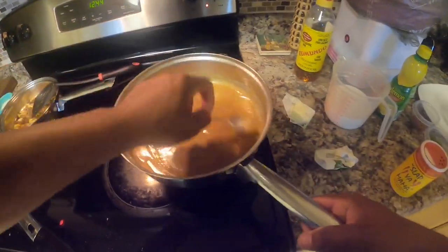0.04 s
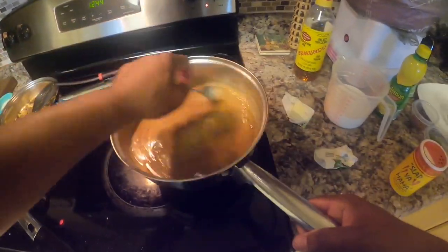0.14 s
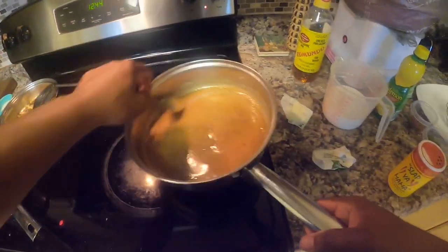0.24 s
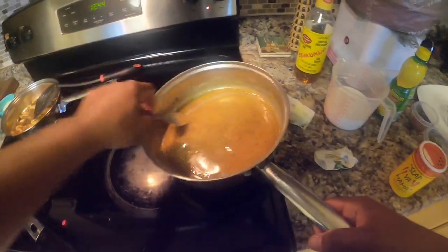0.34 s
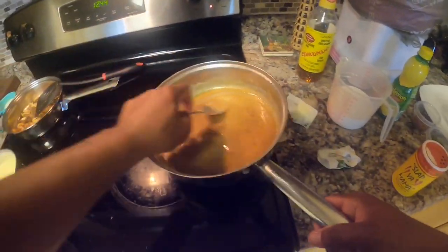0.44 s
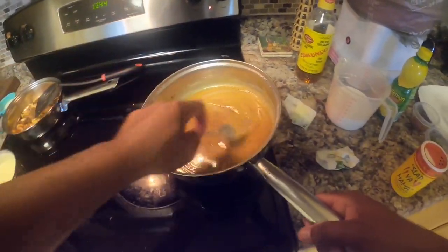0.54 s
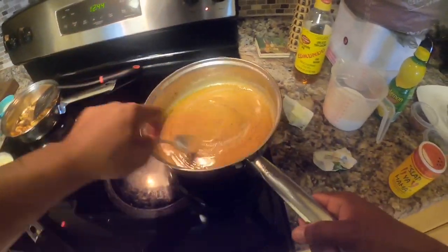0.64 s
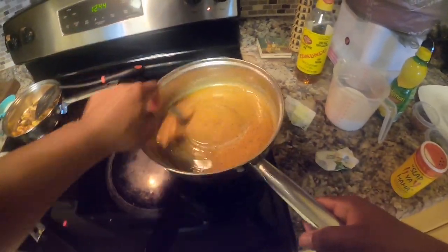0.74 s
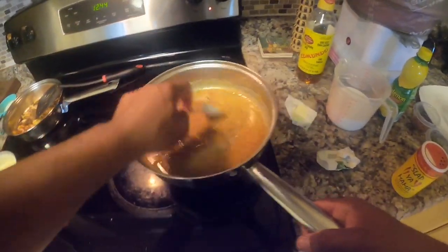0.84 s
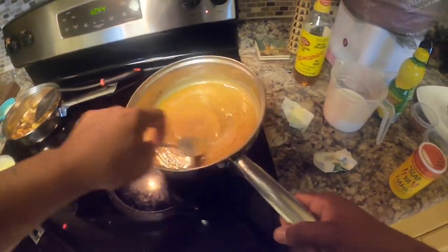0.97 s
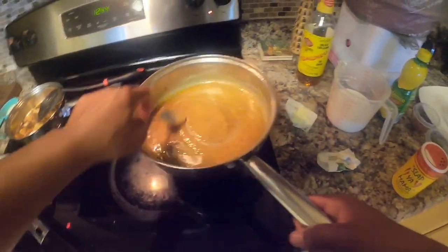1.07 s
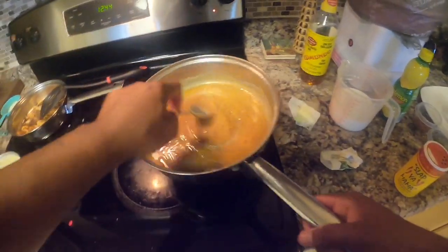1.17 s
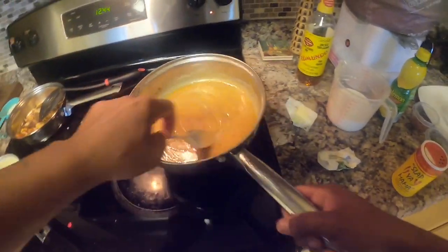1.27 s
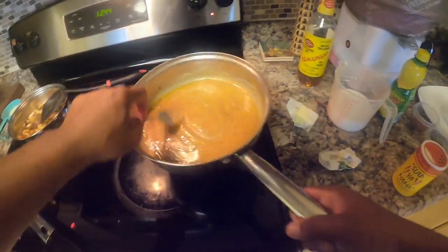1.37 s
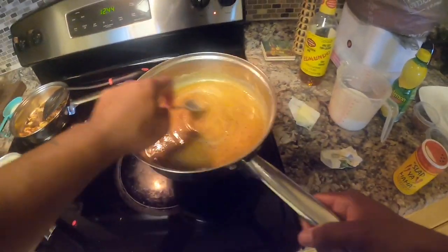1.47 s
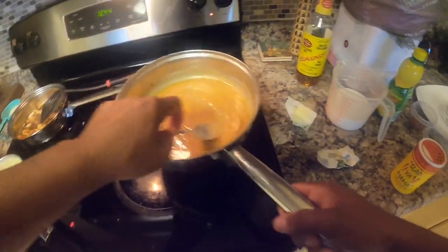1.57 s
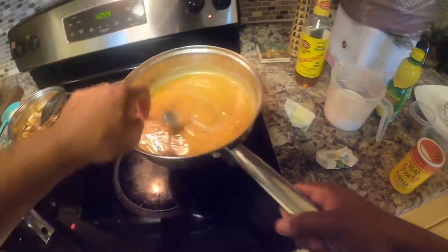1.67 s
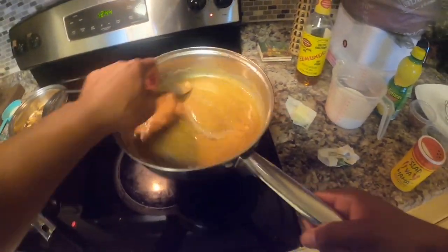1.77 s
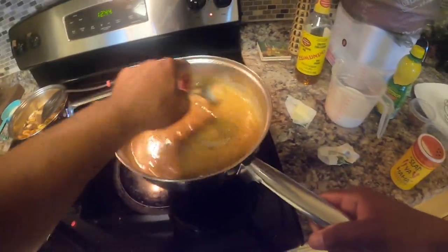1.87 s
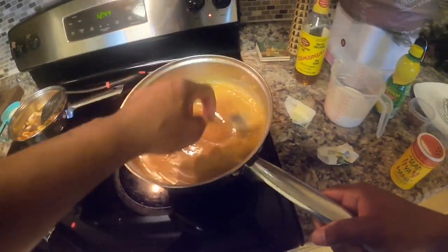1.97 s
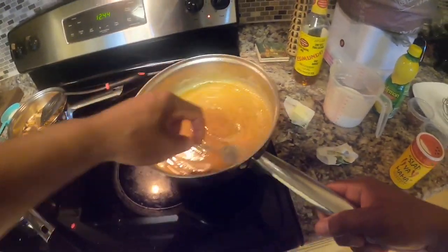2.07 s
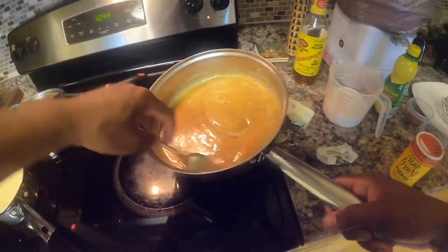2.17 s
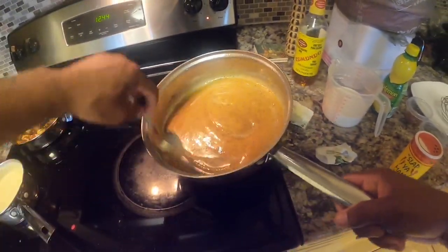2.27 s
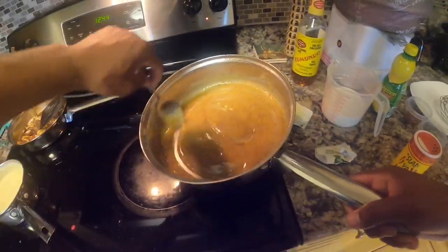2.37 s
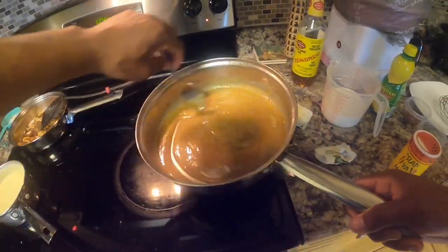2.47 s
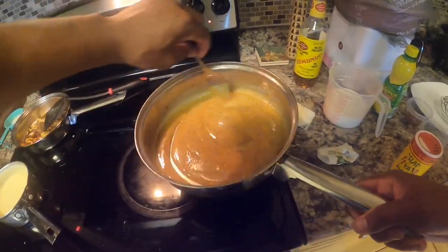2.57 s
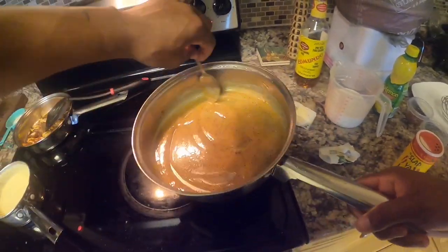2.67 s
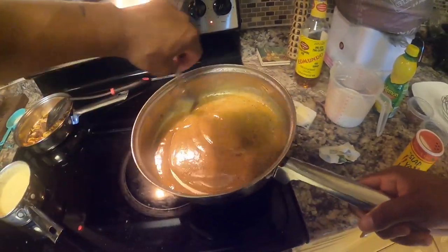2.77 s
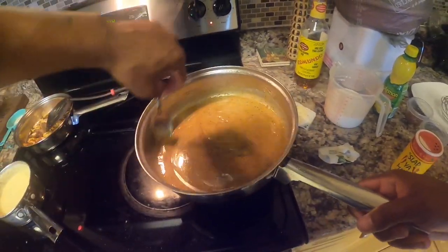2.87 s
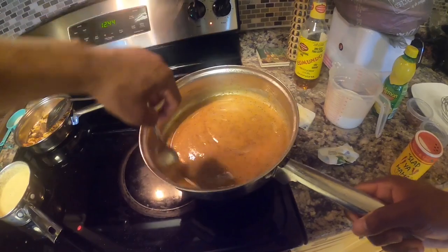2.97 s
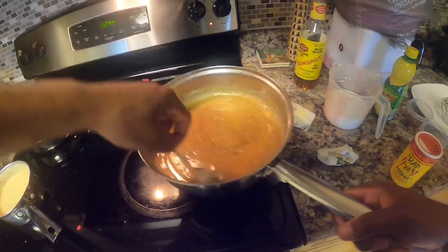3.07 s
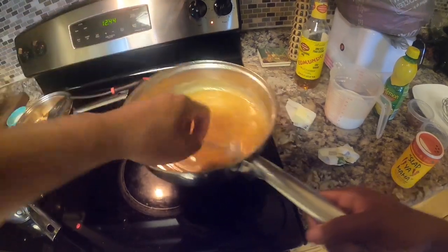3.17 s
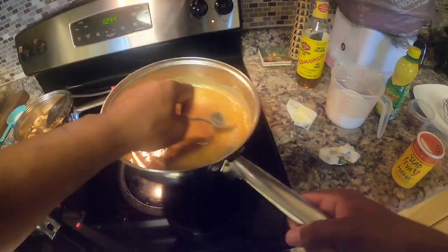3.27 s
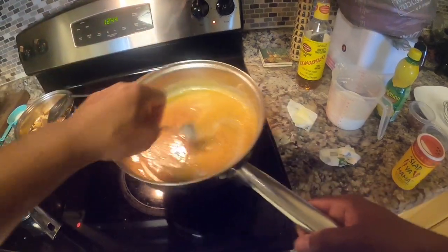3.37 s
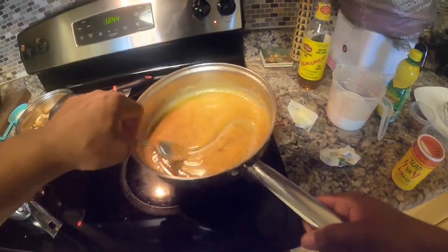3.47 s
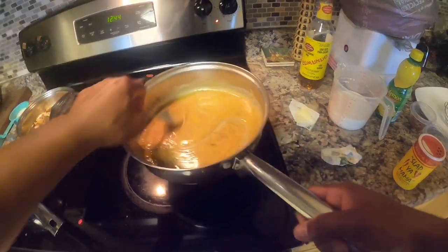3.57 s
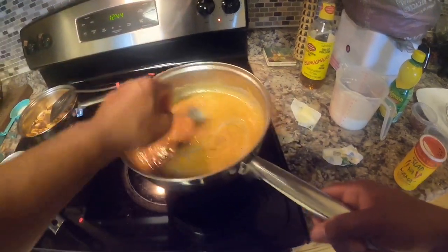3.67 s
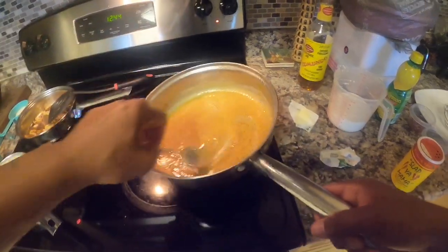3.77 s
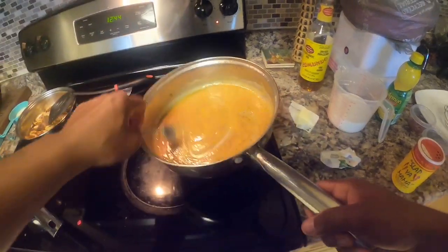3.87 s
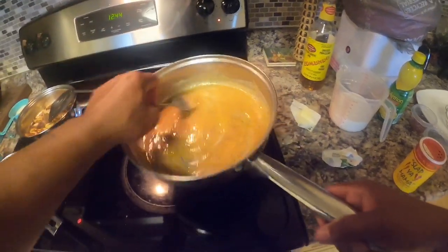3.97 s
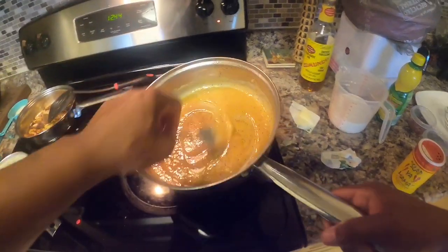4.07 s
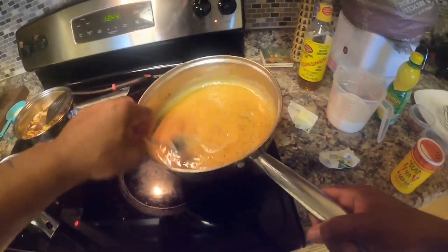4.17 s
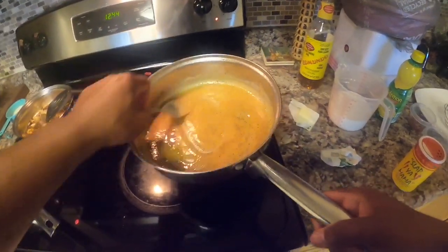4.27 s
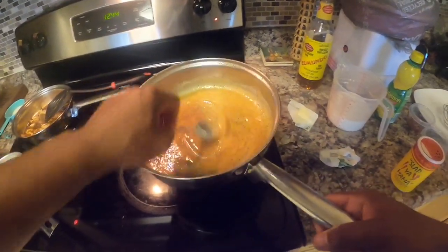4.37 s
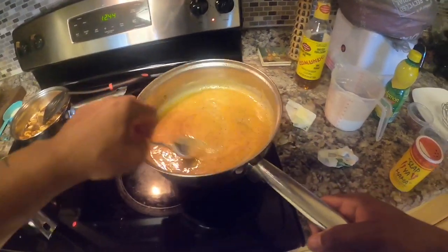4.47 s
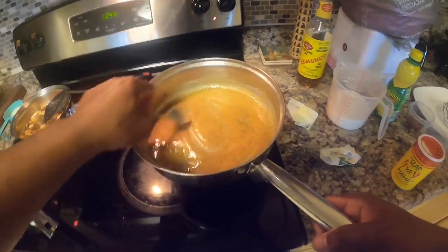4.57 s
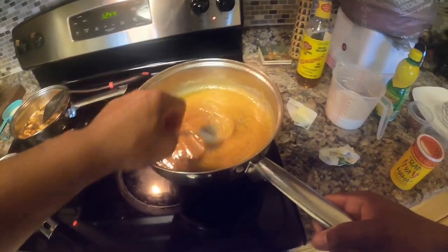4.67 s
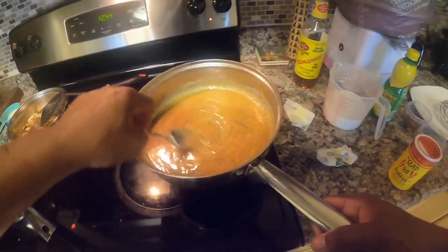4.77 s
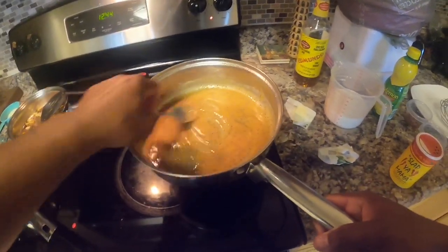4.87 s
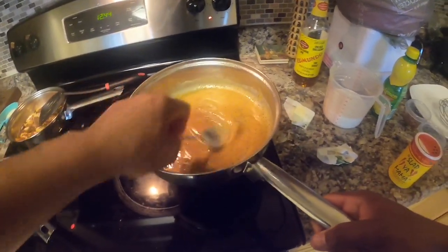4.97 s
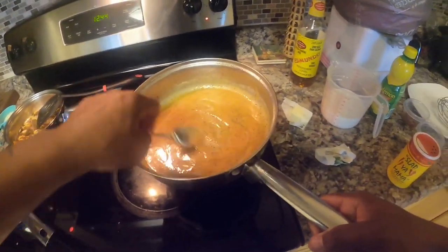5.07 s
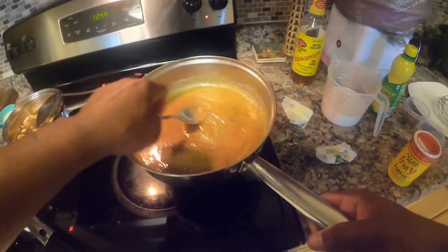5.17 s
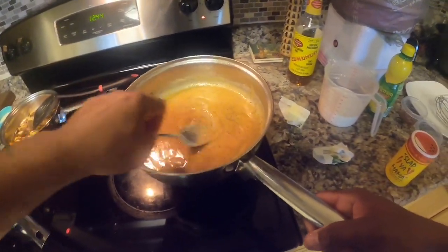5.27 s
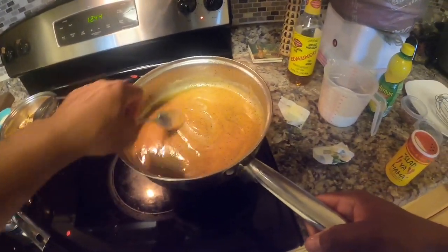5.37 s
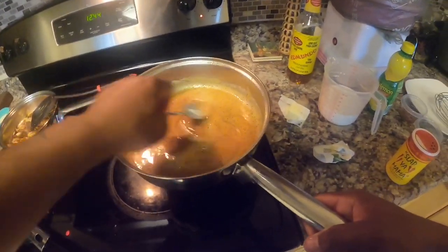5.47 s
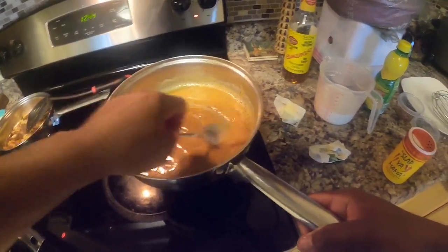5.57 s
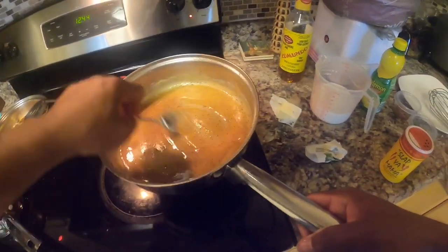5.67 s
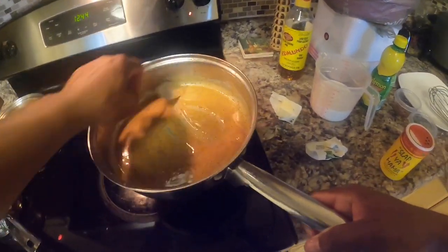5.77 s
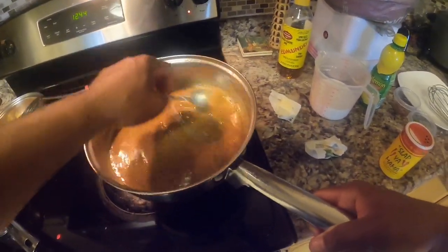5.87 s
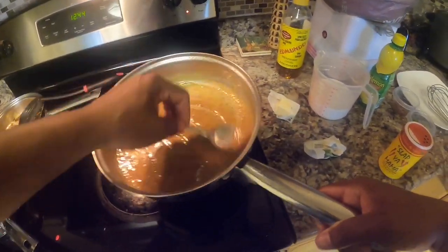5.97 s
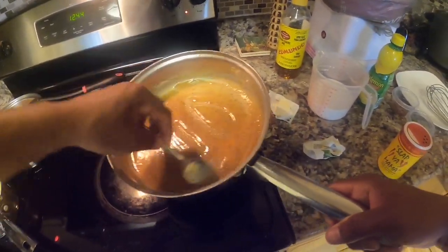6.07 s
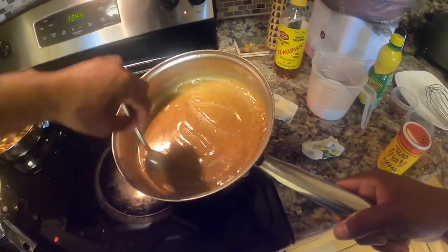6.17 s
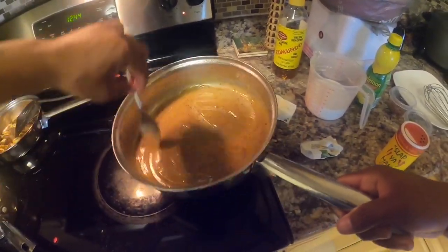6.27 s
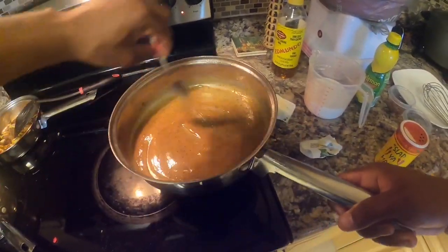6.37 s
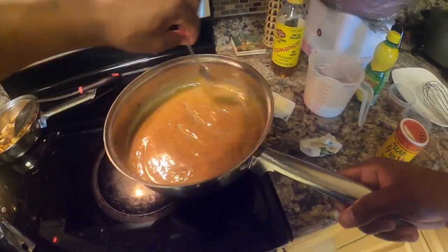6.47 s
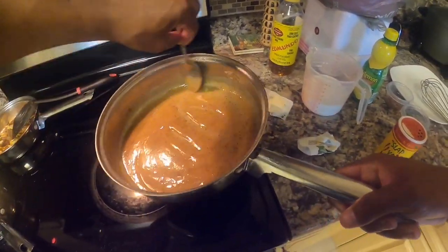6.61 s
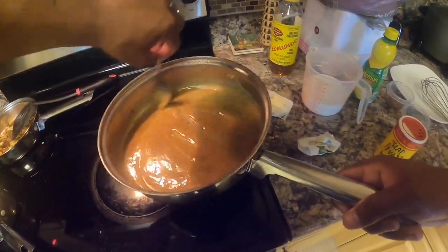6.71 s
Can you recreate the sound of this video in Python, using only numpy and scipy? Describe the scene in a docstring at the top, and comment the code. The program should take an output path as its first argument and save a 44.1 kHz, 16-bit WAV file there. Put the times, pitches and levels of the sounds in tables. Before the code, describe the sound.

A metal spoon stirs thick sauce in a steel pan held by hand. Short scraping strokes and dull clinks follow one another unevenly, ringing the pan briefly before the sauce damps it. Soft wet drags and muffled bumps mix in. The stirring eases around two and a half seconds, a sharper knock and bright skid follow, then it resumes. Close stereo microphones in a small home kitchen, with low rumble, faint hum and handling thumps.

```python
"""A metal spoon stirs thick sauce in a steel pan held in the hand, in a quiet home kitchen.
The spoon rubs and knocks on the pan; this rough force rings the pan's clear low modes and its dense upper ones.
Muffled bumps, lumpy sauce noise, scratches and a ring that slides in pitch are filtered noise or short sines.
Feedback delays give the room's brief answer; a low rumble, handling thumps and a mains hum lie under it.
Two close microphones hear each mode with slightly different timing and level."""
import sys
import numpy as np
from scipy import signal
from scipy.fft import rfft, irfft
from scipy.io import wavfile

SR = 44100
rng = np.random.default_rng(int(sys.argv[2]) if len(sys.argv) > 2 else 0)


def persist_wave(psi):
    """Save psi, clipped to +-1, as 16-bit WAV."""
    counts = np.round(np.clip(psi, -1, 1) * 32767).astype(np.int16)
    wavfile.write(sys.argv[1], SR, np.atleast_2d(counts).T)


def how_loud(loudness_db):
    """Turn decibels into a plain amplitude multiplier (0 dB gives 1, 20 dB gives 10)."""
    steps = np.asarray(loudness_db, float) / 20
    return 10 ** steps


N = 297234
STEP = 64   # samples per step of the slow controls

# clear modes of the pan, damped by sauce and hand: pitch_hz, width_hz, level_db (balance within a zone)
PAN_MODES = [(467.5, 9.9, -9), (600, 48, -29), (915, 8.9, -6), (951.6, 11.3, 0), (1167, 51, -22),
             (1476.8, 13.1, 4), (1830, 23, -13), (2188, 10.4, -3.5), (2650, 19, -8.5), (2736, 18, -4.5),
             (3045.5, 22.7, -3.5), (3470, 33.5, -5.5), (3630, 78, -28), (3690, 20, -17.5), (4008, 50, -10),
             (4560, 17, -19), (4500, 73, -8), (4960, 39, -17), (5020, 33, -18), (5440, 17, -20),
             (5880, 30, -20.5)]
# how much louder the left microphone is than the right: pitch_hz, level_db
LEFT_OVER_RIGHT = [(60, -4), (150, -0.5), (380, 4.5), (950, -0.5), (2380, 2), (5980, 0.5), (15000, -8)]
# the spoon's edge skids along the bare wall, bright and dying away:
# start_s, length_s, ring_db, grit_db (relative to ring), thud_db (relative to ring)
SKID_TIMES = [(2.83, 0.2, -38.5, 5.5, -5.5), (3.093, 0.2, -41.5, 11, -6)]
SKID_RISE_S, SKID_FADE_DB_PER_S = 0.004, 67.5


def rms_one(x):
    """Scale to rms 1."""
    return x / np.sqrt(np.mean(x ** 2) + 1e-20)


def at_hz(points, hz):
    """Read a table on a log-frequency axis."""
    table_hz, value = np.transpose(points)
    return np.interp(np.log(hz), np.log(np.maximum(table_hz, 1)), value)


def drift(rate_hz):
    """Slow random wander of rms 1, one value per control step: noise smoothed by a two-step low-pass."""
    r = np.exp(-2 * np.pi * rate_hz * STEP / SR)
    noise = rng.standard_normal(N // STEP + 1001)
    return rms_one(signal.lfilter([1], [1, -2 * r, r * r], noise)[1000:])   # drop the filter's warm-up


def to_samples(slow):
    """Join control steps by straight lines."""
    return np.interp(np.arange(N) / STEP, np.arange(len(slow)), slow)


def friction(catches_per_s, size_db, share, channels=1):
    """Fine roughness is smooth noise, new for each channel; larger catches are shared jolts of uneven size."""
    caught = rng.random(N) < catches_per_s / SR
    size = how_loud(size_db * np.minimum(rng.exponential(1, N), 4))
    jolts = caught * size * rng.choice([-1, 1], N)
    smooth = rng.standard_normal((channels, N))
    return np.sqrt(1 - share) * smooth + np.sqrt(share) * rms_one(jolts)


def envelopes(rows, rise_s, fade_db_per_s):
    """One loudness shape per row: a rise, a slow fade, a quick lift of the spoon."""
    lift_db_per_s = 405
    start, length = np.transpose(rows)[:2]
    since = np.arange(N // STEP + 1) * STEP / SR - start[:, None]
    faded_db = fade_db_per_s * np.maximum(since, 0)
    lifted_db = lift_db_per_s * np.maximum(since - length[:, None], 0)
    return np.clip(since / rise_s, 0, 1) * how_loud(-faded_db - lifted_db)


def room_tone():
    """Rumble of the house and appliances is shaped noise, partly alike in both microphones; the hum is a sine."""
    # spectrum of the rumble: pitch_hz, level_db (per Hz, only the shape counts)
    rumble_shape = [(12, -43.5), (20, 7), (92, -7), (139, -12.5), (183, -1), (249, -16.5), (294, -19.5),
                    (398, -24.5), (1050, -18.5), (1830, -30), (3010, -31.5), (15000, -57)]
    # likeness of left and right: pitch_hz, likeness (0 to 1)
    likeness = [(60, 0.42), (240, 0.11), (950, 0.46), (3770, 0.29), (15000, 0.21)]
    rumble_db, hum_db, hum_hz = -58.5, -64, 120
    hz = np.maximum(np.fft.rfftfreq(N, 1 / SR), 10)
    alike = np.clip(at_hz(likeness, hz), 0, 1)
    mid, side = rfft(rng.standard_normal((2, N)))
    left_right = np.array([[1], [-1]])
    both = np.sqrt(1 + alike) * mid + np.sqrt(1 - alike) * side * left_right
    shape_db = at_hz(rumble_shape, hz) + 0.5 * at_hz(LEFT_OVER_RIGHT, hz) * left_right
    rumble = rms_one(irfft(both * how_loud(shape_db), N))
    rumble_level = to_samples(how_loud(rumble_db + 2.0 * drift(18)))
    hum = np.sqrt(2) * np.sin(2 * np.pi * hum_hz * np.arange(N) / SR)
    hum_level = to_samples(how_loud(hum_db + 2.8 * drift(3.2)))
    return rumble_level * rumble + hum_level * hum


def handling():
    """Uneven low thumps as the body that carries the microphones moves: noise in a low band."""
    # level of the thumps: time_s, level_db
    thump_level = [(0.0, -47), (0.22, -56), (1.01, -56.5), (1.09, -80), (1.29, -48), (2.08, -51.5),
                   (2.18, -73), (2.61, -49.5), (2.801, -77), (3.26, -42), (3.28, -55.5), (4.34, -50),
                   (4.35, -55), (5.72, -64.5), (5.76, -52.5), (6.46, -57.5), (6.49, -52), (6.74, -49)]
    band_hz, lumps_db, lumps_per_s = (22, 140), 4, 6
    band = signal.butter(2, band_hz, "band", fs=SR, output="sos")
    low = rms_one(signal.sosfilt(band, rng.standard_normal(N)))
    lumpy = rms_one(low * to_samples(how_loud(lumps_db * drift(lumps_per_s))))
    return how_loud(np.interp(np.arange(N) / SR, *np.transpose(thump_level))) * lumpy


def kitchen(x):
    """The room's answer: six feedback delays a side, duller on every round, stepped block by block."""
    t60_s, wall_cut_hz = 0.33, 13000
    dull = np.exp(-2 * np.pi * wall_cut_hz / SR)
    out = np.zeros((2, N))
    lags = (rng.uniform(0.0081, 0.034, 12) * SR).astype(int)
    for k, lag in enumerate(lags):
        loop, state = x.copy(), [0.]
        gain = how_loud(-60 * lag / SR / t60_s)
        for i in range(lag, N, lag):
            back, state = signal.lfilter([gain * (1 - dull)], [1, -dull], loop[i - lag:i], zi=state)
            loop[i:i + lag] += back[:N - i]
        out[k % 2] += (loop - x) * (-1) ** (k // 2)
    return out


def slosh():
    """Heavy pushes drag the spoon's bowl through the sauce: grainy noise in a band of its own for each push."""
    # pushes: start_s, length_s, level_db (before the rise and fade), centre_hz
    pushes = [(1.506, 0.045, -23, 1112), (1.538, 0.084, -34.5, 700), (1.69, 0.063, -31, 970),
              (4.026, 0.032, -45, 295.6), (4.156, 0.056, -32.5, 1260)]
    width_octaves, rise_s, fade_db_per_s = 0.81, 0.011, 61
    grains = friction(900, size_db=3.5, share=0.63)[0]
    out = np.zeros(N)
    for (_, _, db, hz), shape in zip(pushes, envelopes(pushes, rise_s, fade_db_per_s)):
        edges_hz = hz * 2 ** (width_octaves * np.array([-0.5, 0.5]))
        band = signal.butter(2, edges_hz, "band", fs=SR, output="sos")
        out += how_loud(db) * rms_one(signal.sosfilt(band, grains)) * to_samples(shape)
    return out


def bumps():
    """The bowl bumps the sauce-covered bottom: a sine swells and dies in a few cycles, choked by the sauce."""
    # bumps: start_s, peak_db, pitch_hz, length_s
    bump_times = [(0.697, -18.5, 1000, 0.0048), (0.707, -17.5, 1030, 0.0083), (1.028, -20, 1000, 0.012),
                  (1.349, -29, 945, 0.016), (1.369, -28, 1030, 0.0059), (1.597, -18, 1460, 0.025),
                  (2.417, -17.5, 1582, 0.016), (2.766, -18, 1710, 0.006), (2.832, -27, 700, 0.026),
                  (3.539, -28, 1000, 0.027), (3.685, -27.5, 1010, 0.017), (3.83, -24.5, 920, 0.028),
                  (3.857, -19.5, 946, 0.026), (3.895, -29, 1020, 0.013), (4.055, -23.5, 908, 0.051),
                  (4.84, -20, 930, 0.013), (4.86, -28, 936, 0.018), (4.9, -25, 915, 0.023),
                  (4.944, -22, 990, 0.018), (5.032, -22.5, 1488, 0.026), (5.158, -24, 942, 0.014),
                  (5.244, -20.5, 961, 0.017), (5.481, -16, 1021, 0.0092), (5.793, -22, 1020, 0.0097)]
    out = np.zeros(N)
    for s, db, hz, length in bump_times:
        t = np.arange(int(3 * length * SR)) / SR
        u = 4 * t / length   # the swell peaks at u = 1
        swell = (u * np.exp(1 - u)) ** 1.5
        at = int(s * SR)
        out[at:at + len(t)] += how_loud(db) * swell * np.sin(2 * np.pi * (hz * t + rng.random()))
    return out


def rasp():
    """Fine scratching through the wall's bright resonances while the edge skids: twice-filtered friction."""
    # resonances of the bare wall: pitch_hz, width_hz (of each filter pass), level_db (before the envelope)
    wall_rings = [(3345, 750, -30.5), (5700, 800, -37), (8100, 1800, -49.5), (12400, 1800, -62)]
    rough = friction(1500, size_db=0.5, share=0.54, channels=2)
    out = np.zeros((2, N))
    for hz, width_hz, db in wall_rings:
        r = np.exp(-np.pi * width_hz / SR)
        peak = [1, 0, -1, 1, -2 * r * np.cos(2 * np.pi * hz / SR), r * r]
        out += how_loud(db) * rms_one(signal.sosfilt([peak, peak], rough))
    return out * to_samples(envelopes(SKID_TIMES, SKID_RISE_S, SKID_FADE_DB_PER_S).sum(axis=0))


def zone_db(ring_db, grit_db, thud_db, hiss_db):
    """Levels of thud, ring, grit and hiss for each contact; a gritty contact hisses the more."""
    hiss_follows_grit = 0.28
    hiss = hiss_db + (1 + hiss_follows_grit) * grit_db
    return ring_db + np.array([thud_db, 0 * ring_db, grit_db, hiss])


def slides(rows, rise_s, fade_db_per_s, hiss_db):
    """Power that sliding contacts put into each zone."""
    levels = how_loud(zone_db(*np.transpose(rows)[2:], hiss_db))
    return levels ** 2 @ envelopes(rows, rise_s, fade_db_per_s) ** 2


def rubbing():
    """Strength of the rubbing in each zone per control step: the powers of all sliding contacts add up."""
    # the spoon rests on the steel and slides lightly between strokes: start_s, length_s
    contact_times = [(-.05, 2.528), (2.718, 3.57), (6.629, .2)]
    # strokes over the bottom of the pan:
    # start_s, length_s, ring_db, grit_db (relative to ring), thud_db (relative to ring)
    stroke_times = [(-.03, 0.081, -41.5, 4, -19.5), (0.125, 0.14, -41.5, 0, -37),
                    (0.31, 0.0083, -64, 5, -22), (0.41, 0.076, -70.5, 24, -28),
                    (0.475, 0.21, -30, -6, -20.5), (0.68, 0.036, -24.5, -9, -28.5),
                    (0.778, 0.0083, -31, 2.5, -23), (0.787, 0.27, -31.5, -4, -16.5),
                    (0.94, 0.026, -31.5, -5, -18), (1.165, 0.028, -29, -13, -27),
                    (1.095, 0.18, -32, -7, -24), (1.24, 0.055, -30, -4, -15),
                    (1.35, 0.11, -37.5, -3, -14.5), (1.505, 0.17, -28.5, -6, -12),
                    (1.69, 0.087, -31, -6.5, -7), (1.78, 0.07, -31, -3, -20), (1.89, 0.01, -39, 6, -15),
                    (1.97, 0.042, -33, -3, -21.5), (2.06, 0.092, -30.5, -6.5, -22),
                    (2.175, 0.11, -46.5, 7.5, -26), (2.26, 0.12, -37, 1, -9), (2.42, 0.031, -39.5, 1, -18),
                    (2.44, 0.016, -55.5, 10, -29), (2.765, 0.012, -27, -15.5, -20.5),
                    (2.99, 0.16, -65, -6.5, -36), (3.125, 0.034, -41, 9, -9), (3.22, 0.13, -35, -0.5, -15),
                    (3.35, 0.085, -33, -9.5, -15.5), (3.43, 0.05, -38, 1.5, -9.5),
                    (3.53, 0.4, -41, -58.5, -14), (3.69, 0.12, -34, -3.5, -18), (3.76, 0.018, -30, -4, -12),
                    (3.83, 0.098, -31, -5.5, -38), (3.99, 0.12, -34, -2.5, -10),
                    (4.11, 0.099, -29.5, -8, -16.5), (4.155, 0.12, -32.5, -5.5, -28),
                    (4.39, 0.26, -31.5, -6.5, -12), (4.56, 0.063, -34.5, -1, -20),
                    (4.695, 0.066, -25.5, -7, -15), (4.835, 0.03, -33.5, -8, -14),
                    (4.885, 0.011, -31.5, -13, -9.5), (4.935, 0.14, -33.5, -10, -23),
                    (5.015, 0.012, -26.5, -3.5, -12), (5.105, 0.12, -32.5, -12.5, -16),
                    (5.21, 0.14, -31.5, -13.5, -13), (5.28, 0.027, -30, -6, -17.5),
                    (5.385, 0.083, -36, -3, -13.5), (5.475, 0.28, -31.5, -7.5, -16),
                    (5.56, 0.038, -32.5, 1, -30), (5.71, 0.28, -36, 0.5, -15),
                    (5.875, 0.084, -39, -1.5, -8.5), (5.925, 0.015, -33, -1.5, -14.5),
                    (5.965, 0.034, -24, -11, -34), (6.05, 0.044, -41.5, -6.5, -50),
                    (6.13, 0.2, -57.5, 17.5, -39), (6.24, 0.084, -46.5, 3.5, -21),
                    (6.64, 0.0096, -22.5, -4, -14), (6.69, 0.11, -39.5, 0.5, -19)]
    rise_s, stroke_fade_db_per_s = 0.013, 43
    ring_db, grit_db, thud_db = -47.5, -2.5, -34.5   # of the light contact
    resting = [(s, length, ring_db, grit_db, thud_db) for s, length in contact_times]
    power = slides(resting, rise_s, 0, hiss_db=-2)
    power = power + slides(stroke_times, rise_s, stroke_fade_db_per_s, hiss_db=-7)
    power = power + slides(SKID_TIMES, SKID_RISE_S, SKID_FADE_DB_PER_S, hiss_db=-4)
    return np.sqrt(power)


def loaded_ring():
    """One ring of the bottom slides in pitch as the spoon presses on other spots: a slow random swing
    carried on the moving pitch."""
    # the moving ring: time_s, pitch_hz, level_db (relative to the ring's rubbing)
    moving_pitch = [(0.0, 989, -23), (0.3, 1020, -10), (0.7, 1038, -6.5), (0.94, 988, -14),
                    (1.16, 1030, -4.5), (1.28, 992, -8), (1.52, 1080, -1.5), (1.88, 985, -11),
                    (2.399, 1000, -14.5), (2.81, 991, -6), (2.87, 1096, 0.5), (3.19, 980, -13),
                    (3.55, 986, 1), (3.7, 998, -9), (3.78, 1040, -6), (3.85, 975, -5), (3.92, 1015, -2.5),
                    (4.0, 1047, -6), (4.08, 1027, -3), (4.17, 1004, -6), (4.26, 1020, -8), (4.4, 1006, -2),
                    (4.47, 972, -5.5), (4.58, 1035, 1), (4.651, 1000, -6), (4.71, 1080, -7.5),
                    (4.8, 1001, -14), (4.95, 1065, -7), (5.03, 1113, -6.5), (5.15, 1012, -6),
                    (5.24, 986, -11), (5.4, 990, -4), (5.48, 1040, 0), (5.55, 1097, -17), (5.62, 997, -11),
                    (5.8, 1018, -8), (5.88, 1082, -9), (6.0, 970, -8), (6.4, 982, -12), (6.74, 1014, 0)]
    width_hz = 47
    s, hz, db = np.transpose(moving_pitch)
    t = np.arange(N) / SR
    r = np.exp(-np.pi * width_hz / SR)
    rough = friction(300, size_db=5.0, share=0.53, channels=2)
    drive = rough * to_samples(rubbing()[1]) * how_loud(np.interp(t, s, db))
    swing = signal.lfilter([2 * (1 - r) ** 1.5], [1, -2 * r, r * r], drive[0] + 1j * drive[1])
    turns = np.cumsum(np.interp(t, s, hz)) / SR
    return np.real(swing * np.exp(2j * np.pi * turns))


def all_modes():
    """Clear modes, then dense ones that are about as wide as their spacing."""
    # dense overlapping modes: pitch_hz, level_db (balance within a zone)
    dense_levels = [(290, -30), (400, -56.5), (620, -22.5), (830, -39.5), (1080, -20), (1300, -38),
                    (1650, -30), (2100, -28), (3300, -18), (5500, -18), (7000, -28.5), (8000, -28),
                    (10000, -39), (12500, -47.5), (14200, -56), (15500, -80)]
    dense_hz = np.geomspace(260, 15300, num=110) * (1 + 0.008 * rng.standard_normal(110))
    return PAN_MODES + [(f, 0.019 * f + 20, at_hz(dense_levels, f)) for f in dense_hz]


def blows(count):
    """Force of each knock: one sharp tick and a few milliseconds of chatter."""
    tick_share, chatter_s = 0.37, 0.0023   # share of the energy; decay time
    decay = np.exp(-np.arange(600) / (chatter_s * SR))
    blow = np.sqrt(1 - tick_share) * decay * rng.standard_normal((count, 600))
    blow[:, 0] = np.sqrt(tick_share * chatter_s * SR / 2)
    return blow


def tone_db(hz, zone):
    """Slow change of a mode's drive as the spoon wanders: the two main rings trade places, the treble changes."""
    # wandering tone: time_s, upper_ring_db (relative to the lower ring), treble_db
    tone_moves = [(0.0, -8, 6), (0.178, 5.5, -0.5), (0.36, -4, 1.5), (0.54, 0.5, -1), (0.72, 3, 1),
                  (0.9, -3.5, 1.8), (1.08, 9, 2.5), (1.26, -4.5, 0), (1.44, 0, -0.3), (1.62, 3.5, -3),
                  (1.8, -0.5, 0.5), (1.98, -7, -1.5), (2.16, -0.5, -1), (2.34, -5, 3), (2.52, 12, -3.5),
                  (2.7, -4.5, -6), (2.881, 6.5, 5), (3.06, 3.5, 3.2), (3.24, -5.5, -5), (3.42, 7, -2),
                  (3.6, 2, -3), (3.78, -0.5, 3), (3.96, -3.5, -0.8), (4.14, 4, 2.5), (4.32, -5, -2),
                  (4.5, 0.5, 4.5), (4.68, -5, 1), (4.86, -7, 2), (5.04, -2, 0.5), (5.22, -2, 2),
                  (5.399, -2, 1.5), (5.58, -3, -2.5), (5.761, -5.5, 0.5), (5.94, -2, 3.5), (6.12, -5, -3.5),
                  (6.3, 5.5, -4.5), (6.48, 38, -3), (6.66, -10.5, 6)]
    ring_split_hz = 1300
    s, upper_db, treble_db = np.transpose(tone_moves)
    ring_db = upper_db * (0.5 if hz > ring_split_hz else -0.5)
    change_db = [0 * s, ring_db, 0 * s, treble_db][zone]
    return np.interp(np.arange(N // STEP + 1) * STEP / SR, s, change_db)


def at_microphones(swing, hz, r, w):
    """Each mode reaches the two microphones with its own phase and level, swaying between left and right."""
    # spread of the left-right phase: pitch_hz, spread_rad
    phase_spread = [(300, 0.072), (1200, 0.17), (3000, 0.6), (7000, 0.34), (14000, 0.37)]
    # how far a mode sways between left and right: pitch_hz, sway (before a soft limit)
    sway_depth = [(500, 0.046), (3000, 0.26), (7000, 0.39), (14000, 0.97)]
    left_lag_s = 3e-5
    turn = -2 * np.pi * hz * left_lag_s + at_hz(phase_spread, hz) * rng.standard_normal()
    sway = to_samples(np.tanh(at_hz(sway_depth, hz) * drift(25.0)))
    sides = []
    for half in (0.5, -0.5):   # left, right
        phase = w + half * turn
        heard = signal.lfilter([np.sin(phase), r * np.sin(w - phase)], [1], swing)
        sides.append(how_loud(half * at_hz(LEFT_OVER_RIGHT, hz)) * (1 + 2 * half * sway) * heard)
    return np.array(sides)


def pan():
    """Rubbing and knocks ring every mode, a damped resonator; how well each is driven wanders as the spoon
    moves over its nodes."""
    # lower edges of the thud, ring, grit and hiss zones, then the top: edge_hz
    zones_hz = [250, 850, 2000, 5500, 16000]
    # spoon on steel: time_s, ring_db, grit_db (relative to ring), thud_db (relative to ring)
    knock_times = [(0.013, -39, 10, -26), (0.218, -22, -3, -21.5), (0.326, -22.5, -8.5, -28),
                   (0.412, -17.5, -3, -23), (0.475, -16, -8, -31), (0.712, -20, -5, -24),
                   (0.786, -13.5, -4.5, -15), (0.845, -45, -35, -8), (1.028, -35.5, 13, -0.5),
                   (1.099, -21, -6, -35), (1.151, -24, -8, 0), (1.216, -15.5, -14, -42),
                   (1.508, -12, -32, -4), (1.559, -30, -15, -22), (1.598, -11.5, -8.5, -41),
                   (1.787, -24.5, 2, -16), (1.886, -10.5, -0.5, -7), (1.978, -32.5, 2, -4),
                   (2.065, -17, -11.5, -34), (2.178, -27, 8, -15), (2.211, -34, 7, -44),
                   (2.268, -15.5, -5.5, -15), (2.415, -20, 3, -18), (2.756, -39, -9, -8),
                   (2.765, -10.5, -3, -10), (2.83, -15.5, -4.5, -5.5), (3.093, -40, 19, -13),
                   (3.275, -32, 11.5, -10), (3.549, -18.5, -26, -37), (3.839, -13.5, -20, -10),
                   (4.028, -18.5, -7, -2), (4.101, -19.5, -4, -23), (4.57, -24, -15, -13),
                   (4.58, -16.5, -6, -26), (4.903, -19.5, -4.5, -17), (4.974, -29, -5, -17.5),
                   (5.031, -32.5, 0.5, -37.5), (5.106, -14.5, -18, -45), (5.48, -24.5, 1.5, -3),
                   (5.603, -16, -18, -22), (5.783, -31, 6, -15), (5.835, -32.5, 10.5, -12),
                   (5.869, -12, 1, -8), (6.01, -26, 1, -34), (6.097, -24.5, -3.5, -30),
                   (6.142, -24, -3.8, -37), (6.186, -26.5, 5.5, -16), (6.272, -25.5, 6, -43),
                   (6.638, -18, -10, 4), (6.67, -21.5, -6, -27), (6.69, -13, 3, -5.5)]
    # each mode flickers on its own, one value per zone: wander_db
    wander_db = [1.9, 2.17, 4.2, 3.4]
    colour_db, colour_octaves = 1.8, 0.4   # neighbours swell together as the contact point moves
    waver_s, wavers_per_s = 1.2e-4, 4      # the shifting sauce bends the clear modes slightly
    crack_db = 1   # a knock drives the dense grit modes harder than rubbing does

    modes = np.array(all_modes())
    zones = np.searchsorted(zones_hz, modes[:, 0]) - 1
    # power of each zone under unit noise, to be divided out
    power = np.bincount(zones, how_loud(modes[:, 2]) ** 2 * modes[:, 1] * np.pi / SR)
    rub = rubbing()
    patch = (np.log2(modes[:, 0] / zones_hz[0]) / colour_octaves).astype(int)
    patch_db = [colour_db * drift(7.3) for _ in range(30)]
    pressure = to_samples(how_loud(1.73 * drift(31)))   # trembles
    force = friction(700, size_db=4.0, share=0.48, channels=3) * pressure

    knocks = np.array(knock_times)
    knock_db = zone_db(*knocks[:, 1:].T, hiss_db=-9.5)
    at = np.round(knocks[:, 0] * SR).astype(int)[:, None] + np.arange(600)
    blow = blows(len(at))
    luck_db = 2.0 * rng.standard_normal((len(at), len(modes)))

    out = np.zeros((2, N))
    for k, ((hz, width_hz, level_db), zone) in enumerate(zip(modes, zones)):
        clear = k < len(PAN_MODES)
        shift_db = tone_db(hz, zone)
        moving_db = wander_db[zone] * drift(13.3) + patch_db[patch[k]] + shift_db
        drive = force[k % 3] * to_samples(rub[zone] * how_loud(moving_db))
        strength_db = knock_db[zone] + luck_db[:, k] + shift_db[at[:, 0] // STEP]
        if not clear and zone == 2:
            strength_db = strength_db + crack_db
        np.add.at(drive, np.minimum(at, N - 1), how_loud(strength_db)[:, None] * blow)

        r, w = np.exp(-np.pi * width_hz / SR), 2 * np.pi * hz / SR
        gain = 2 * (1 - r) * how_loud(level_db) / np.sqrt(power[zone])
        swing = signal.lfilter([gain], [1, -2 * r * np.cos(w), r * r], drive)
        if clear:
            bend = SR * waver_s * to_samples(drift(wavers_per_s))
            swing = np.interp(np.arange(N) + bend, np.arange(N), swing)
        out += (-1) ** k * at_microphones(swing, hz, r, w)
    return out


def scene():
    """The pan, its echo in the kitchen, the room tone and handling."""
    direct = pan() + loaded_ring() + rasp() + slosh() + bumps()
    echo = how_loud(-19.5) * kitchen(direct.mean(axis=0))
    return direct + echo + room_tone() + handling()


def low_pass(x):
    """Removes everything above the highest recorded frequency."""
    return signal.sosfilt(signal.butter(12, 15870, fs=SR, output="sos"), x)


def record(dry):
    """A steep low-pass cuts the top of the sound."""
    top_cut = signal.cheby2(8, 40, 15800, fs=SR, output="sos")   # order, depth in dB, stop edge in Hz
    mix = signal.sosfilt(top_cut, dry)
    return low_pass(mix)


dry = scene()
out = record(dry)
persist_wave(out)
```